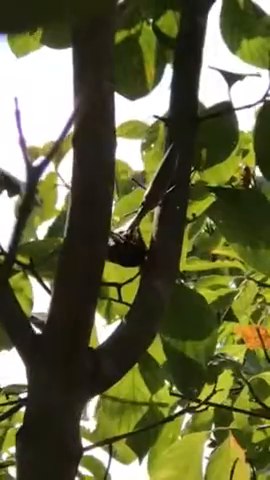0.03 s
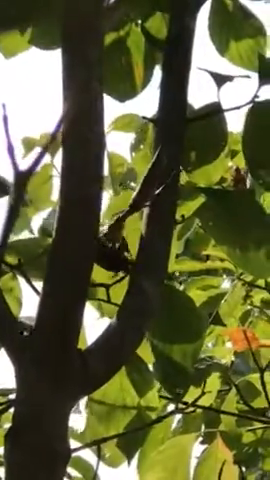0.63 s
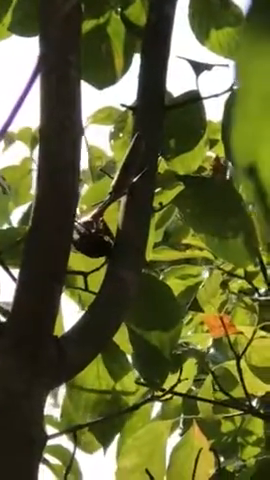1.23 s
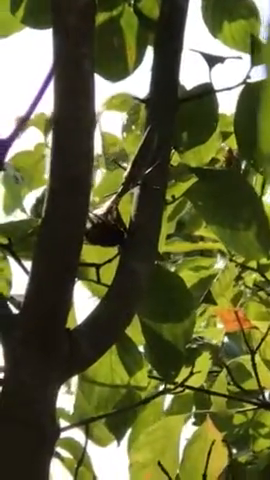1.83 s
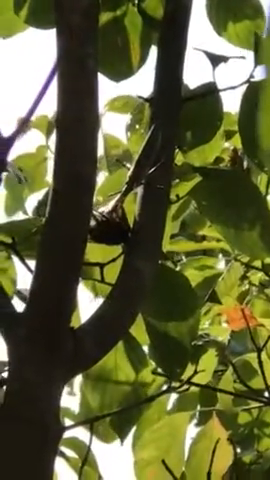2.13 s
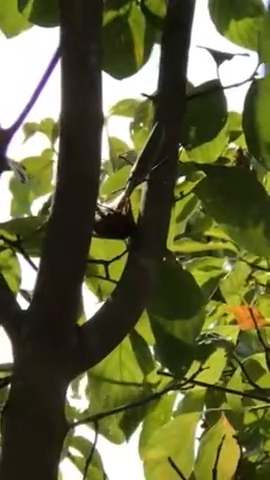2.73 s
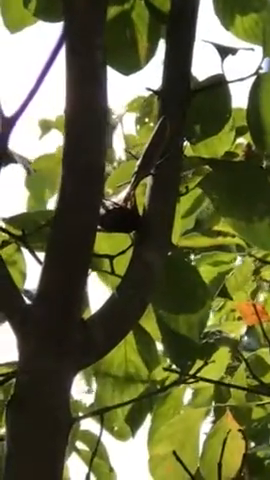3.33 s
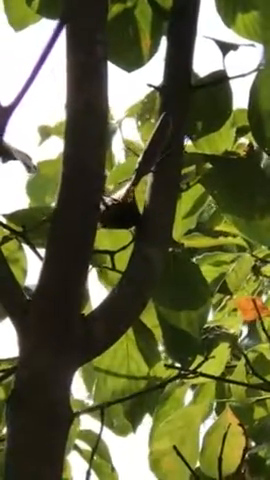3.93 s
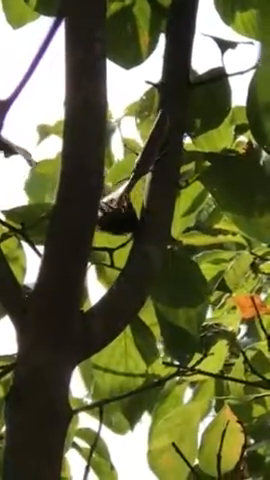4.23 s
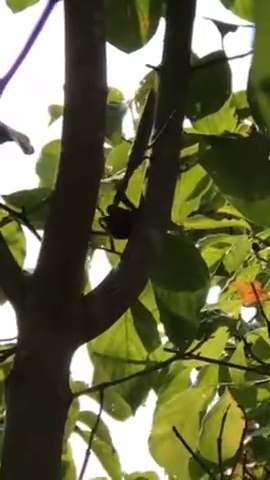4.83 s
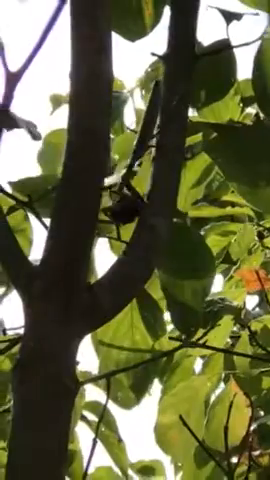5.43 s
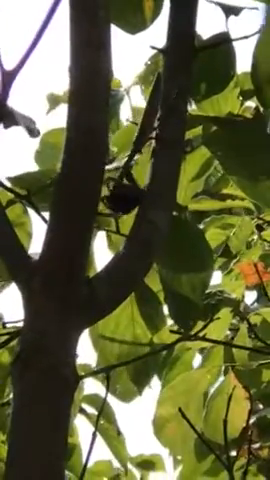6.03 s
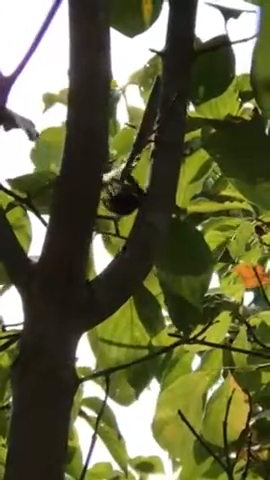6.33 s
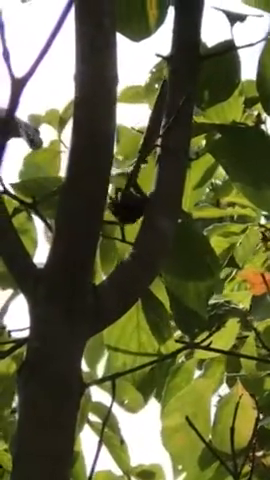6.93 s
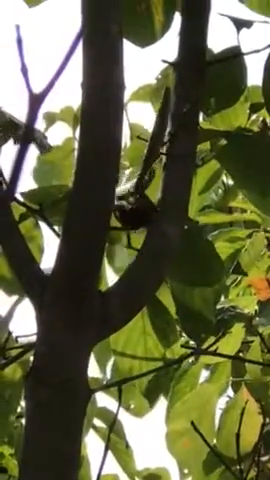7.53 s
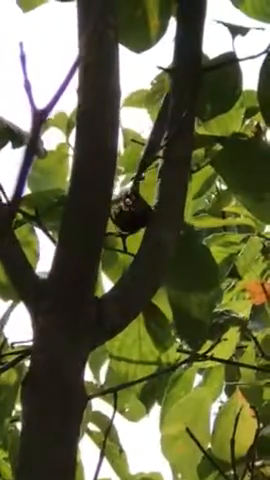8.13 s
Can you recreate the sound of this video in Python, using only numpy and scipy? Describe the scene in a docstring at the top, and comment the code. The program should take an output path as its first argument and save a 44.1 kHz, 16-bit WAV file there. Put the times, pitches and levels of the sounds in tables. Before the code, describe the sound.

A captured cicada buzzes its wings in harsh, irregular, crackling fits in a tree, over a faint outdoor wash.

```python
"""A cicada, held by a predator in the fork of a tree, thrashes its wings about 38 times a second, in fits.
Every stroke snaps the stiff wings against bark and legs, and the snaps scatter among trunks and leaves.
In the second half the wings also quiver softly against the bark. Behind the insect are soft bumps of a
hand on the microphone, a few thin far chirps, a dull wash of leaves and traffic, and a machine's hum."""
import sys
import numpy as np
from scipy import signal
from scipy.fft import rfft, irfft
from scipy.io import wavfile

SR = 44100
rng = np.random.default_rng(int(sys.argv[2]) if len(sys.argv) > 2 else 0)


def output_pcm(signal):
    """Save a mono or channel-first signal as 16-bit PCM at the path in sys.argv[1].

    Samples are clipped to [-1, 1] before scaling.
    """
    pcm = np.clip(np.atleast_2d(signal).T, -1, 1) * 32767
    wavfile.write(sys.argv[1], SR, np.round(pcm).astype(np.int16))


N = 360738
TIME = np.arange(N) / SR

# A snap's "body" boosts its lower pitches; its "scatter" is how much nearby bark and leaves throw back.
# Fits of wing beats: (first stroke [s], last stroke [s], extra time for the first beat [s],
# start level [dB], end level [dB], return stroke against main stroke [dB], body [dB], scatter [dB])
WING_FITS = [(0.517, .5447, 0, -41.5, -48, -20, 4, -2), (0.5722, .6708, 0.00076, -35, -35, -22, 4, -3),
             (0.7034, 0.8114, 0.0026, -32.5, -33.5, -18, 2.5, -4),
             (.8672, 0.9052, 0.0064, -33, -41, -25.5, 3.5, -0.5),
             (3.9555, 3.98, 0.017, -42, -46, -20, 0.5, -2.5), (4.399, 4.5063, 0.004, -47.5, -45, -5, 1, 4),
             (4.546, 4.8363, 0.00063, -29, -30.5, -15, -1.5, -1.5),
             (5.1, 5.127, 0, -31.5, -34, -21, 1.5, -2),
             (5.2412, 5.4522, 0.0031, -33, -31.5, -12, 1.5, -1.5),
             (5.5321, 5.642, 0.0056, -31, -28, -16.5, 0, -1.5),
             (5.728, 5.76, 0.0012, -31.5, -33, -14, 0, 0), (5.8447, 5.9852, .003, -32.5, -32, -9, -1, 1.5),
             (6.076, 6.218, .001, -35.5, -33.5, -7, 1.5, 3.5), (6.325, 6.3564, 0, -34.5, -35, -10, -0.5, 2),
             (6.453, 6.4814, 0.0048, -37, -36.5, -31.5, 2.5, 1.5),
             (6.587, 6.638, 0, -37, -36, -25.5, 1, 1.5), (6.7699, 7.005, 0.0019, -35.5, -29, -11.5, 0.5, 0),
             (7.104, 7.135, 0.0078, -31.5, -27, -21, -0.5, -2.5),
             (7.275, 7.336, 0, -30.5, -31.5, -6.5, 1.5, -3), (7.593, 7.832, 0, -38, -34, -13, 0, 5.5),
             (8.0593, 8.089, 0.0083, -31, -32, -11.5, 1.5, -3)]
# Strokes that hit the bark squarely: (time [s], level [dB])
SQUARE_HITS = [(4.784, -25), (4.8374, -27), (5.2397, -28.5), (5.399, -26.5), (5.5618, -26), (5.6138, -26),
               (6.218, -33), (6.823, -28), (6.926, -26), (7.671, -26), (7.7238, -26), (7.8062, -28)]
# Lone flicks of a wing: (time [s], level [dB], body [dB], scatter [dB])
WING_FLICKS = [(.412, -60, -15.5, 3), (.4992, -49, -2, 1), (0.5626, -41, 5.5, 0), (0.831, -45, -2, 5.5),
               (.844, -37, 7.5, -4), (3.8887, -50, 11, -1), (4.1519, -49, 3.5, 1.5), (4.167, -43, 8, .5),
               (4.2176, -40, 1, -1.5), (4.2895, -43, -2, -6), (4.381, -52.5, 5, 8), (4.53, -37, -5, 0),
               (4.9794, -30.5, 2.5, -5.5), (5.7714, -32.5, 9, -8), (6.7808, -38.5, 0, 0),
               (7.4636, -40, 0.5, 0), (7.9459, -29.5, -4, -2.5)]
TWIST_S = 2.0   # the insect twists round here, so its wings strike with another tone colour
# Tone colour of a snap before the twist: (frequency [Hz], relative level [dB])
COLOUR_BEFORE_TWIST = [(150, -17.5), (500, -14), (1500, -15), (2300, -12), (3700, -7), (5200, -9),
                       (6300, -3.5), (7600, -4.5), (8800, 1), (10600, -1.5), (12000, -1), (15700, -2.5),
                       (17000, -31)]
# Tone colour of a snap after the twist: (frequency [Hz], relative level [dB])
COLOUR_AFTER_TWIST = [(150, -27), (420, -19.5), (700, -14.5), (1500, -14), (2800, -12), (4300, -10.5),
                      (6300, -9.5), (7800, -8), (8500, -3), (9200, -1.5), (10500, -4.5), (12000, -0.5),
                      (15700, -1.5), (17000, -18)]
# Pitches the wing rings at: (pitch [Hz], width [Hz], level before the twist [dB], level after it [dB])
WING_RESONANCES = [(2750, 260, -22, -4.5), (3570, 170, -11, -5), (4460, 75, 3, -18), (6100, 180, -6.5, -20),
                   (8860, 150, -4, -14)]
# Strokes that set a twig ringing briefly: (time [s], pitch [Hz], peak level [dB])
TWIG_PINGS = [(.5665, 5400, -48), (.7025, 6200, -38), (5.129, 5650, -39)]
# Strength of the quivering, which lets up briefly after 6.2 s: (time [s], level [dB])
QUIVER_LEVEL = [(4.25, -99), (4.42, -62), (5.4, -64), (6.1, -63.5), (6.3, -73.5), (6.73, -71), (6.85, -63),
                (8.18, -64)]
# Tone colour of the quivering: (frequency [Hz], relative level [dB])
RUBBING_COLOUR = [(300, 8.5), (1500, 1.5), (3000, 1), (7500, 0), (9000, -1), (10500, 1), (12500, -6),
                  (15700, -1)]
# Tone colour of the sound thrown back by bark and leaves: (frequency [Hz], gain [dB])
SCATTER_COLOUR = [(300, 1), (1500, -5.5), (4500, 0), (9000, 1.5), (15000, -1)]
# Echoes from the two trunks of the fork and a near branch: (delay [s], gain [dB])
TRUNK_ECHOES = [(.0023, -38), (.0055, -24.5), (0.0119, -18.5)]
# Bumps of the hand: (centre time [s], pitch [Hz], level [dB], overtone against the thud [dB])
HAND_BUMPS = [(.146, 47.6, -49, -4), (0.442, 209.5, -46.5, -22.5), (0.469, 268, -50.5, -27),
              (.534, 81, -54, 6), (1.731, 48, -52, -10), (1.89, 62.8, -43, -2.5), (2.041, 64.7, -52, -20),
              (2.524, 60, -56, -9.5), (2.849, 61.3, -55.5, -16), (6.74, 73, -59, -16),
              (7.509, 49.4, -52, -10), (7.677, 57.6, -43, -10)]
# Chirps of far insects: (start [s], length [s], level [dB])
FAR_CHIRPS = [(.29, 0.093, -86), (1.02, .14, -82), (1.308, .16, -82), (1.596, 0.14, -81.5)]
# Tone colour of the outdoor wash: (frequency [Hz], relative level [dB])
WASH_COLOUR = [(150, -24), (250, -0.5), (367, -3.5), (500, -7), (1500, -7), (2900, -9), (4500, -12.5),
               (6400, -17), (7600, -20), (9500, -23), (12000, -27), (15700, -25.5)]
# Tone colour of the far traffic: (frequency [Hz], relative level [dB])
TRAFFIC_COLOUR = [(20, -43), (40, -9.5), (58, 3.5), (80, -4), (105, -4), (170, -8), (260, -11),
                  (400, -29.5), (800, -37)]
# Strength of the far traffic: (time [s], level [dB])
TRAFFIC_LEVEL = [(0, -68), (.5, -64), (1.3, -67.5), (3.5, -68.5), (8.18, -65)]
# Bands that the microphone's housing weakens: (frequency [Hz], width [Hz], share removed [0-1])
HOUSING_NOTCHES = [(4920, 720, 0.24), (7760, 240, 0.47), (10550, 600, 0.34)]


def cicada_wings(trim_db=-0.93):
    """Every contact makes a snap, which rings in the wing and bounces off the surroundings."""
    snaps = np.zeros(N)
    for time_s, db, body_db, scatter_db in wing_contacts():
        colour = COLOUR_BEFORE_TWIST if time_s < TWIST_S else COLOUR_AFTER_TWIST
        add(snaps, time_s, from_db(db + trim_db) * wing_snap(colour, body_db, scatter_db))
    wings = snaps.copy()
    for hz, width, before_db, after_db in WING_RESONANCES:
        wings += from_db(np.where(TIME < TWIST_S, before_db, after_db)) * resonance(snaps, hz, width)
    trunks = sum(from_db(db) * delayed(wings, delay_s) for delay_s, db in TRUNK_ECHOES)
    return wings + trunks + hard_echo(wings) + far_trees(wings)


def wing_contacts(square_body_db=-1.5, square_scatter_db=-1.5):
    """List every touch of a wing as (time [s], level [dB], body [dB], scatter [dB])."""
    fits = [wing_beats(*fit) for fit in WING_FITS]
    grazes, strokes, returns = (uneven(np.vstack(rows)) for rows in zip(*fits))
    for time_s, db in SQUARE_HITS:
        nearest = np.argmin(np.abs(strokes[:, 0] - time_s))
        strokes[nearest] = time_s, db, square_body_db, square_scatter_db
    return np.vstack([strokes, returns, grazes, WING_FLICKS])


def wing_beats(first_s, last_s, lag_s, start_db, end_db, return_db, body_db, scatter_db, beat_hz=37.5):
    """One fit: in each beat the wing tip grazes the bark, then the wing strikes and swings back."""
    steady_s = last_s - first_s - lag_s
    count = max(round(steady_s * beat_hz), 1)
    beat_s = steady_s / count
    beat = np.arange(count + 1)
    times = first_s + beat * beat_s + lag_s * (beat > 0)
    levels = np.linspace(start_db, end_db, count + 1)
    strokes = np.array([(time_s, db, body_db, scatter_db) for time_s, db in zip(times, levels)])
    grazes = strokes + [0, -14, 0, 6.5]   # quieter and more scattered
    grazes[:, 0] -= np.where(beat > 0, 0.0042, 0.0034)   # a shorter lead when the wing starts from rest
    returns = strokes + [0.48 * beat_s, return_db, 2.5, -1.5]   # mid-beat, duller and less scattered
    return grazes, strokes, returns


def uneven(contacts, jitter_s=0.0002, level_db=1.1265, colour_db=0.84):
    """No two snaps are quite alike in timing, strength or tone colour."""
    return contacts + rng.standard_normal(contacts.shape) * [jitter_s, level_db, colour_db, colour_db]


def wing_snap(colour, body_db, scatter_db, buckle_s=0.0015, body_hz=7500, size=8192):
    """The wing's thin skin buckles in a tiny crackle; bark and leaves throw back a short, dense tail."""
    t, hz = TIME[:size], np.fft.rfftfreq(size, 1 / SR)
    crackle = burst(np.exp(-0.5 * (t / buckle_s) ** 2), energy=buckle_s * SR)
    # The wing points elsewhere at every stroke, so each tail is new.
    swell = np.clip(2 * t / 0.0037 - 1, 0, 1)   # fully risen after 3.7 ms
    tail = burst(swell * fade(t, fade_s=0.09), energy=buckle_s * SR)
    scattered = rfft(tail) * from_db(scatter_db + at_hz(SCATTER_COLOUR, hz))
    # Every spot that is hit has a slightly different tone colour.
    spot_db = np.interp(hz, np.geomspace(400, 16000, 16), 2.48 * rng.standard_normal(16))
    body = 1 / (1 + (hz / body_hz) ** 6)
    gain = rms_one(from_db(at_hz(colour, hz) + body_db * body + spot_db))
    return irfft((rfft(crackle) + scattered) * causal(gain))


def twig_pings(ring_s=0.032):
    """A struck twig rings briefly at a single pitch."""
    out, t = np.zeros(N), TIME[:SR // 4]
    for time_s, hz, db in TWIG_PINGS:
        add(out, time_s, from_db(db) * fade(t, ring_s) * np.sin(2 * np.pi * hz * t))
    return out


def wing_quiver():
    """Quivering wings rub on the bark with a soft hiss."""
    return from_db(in_time(QUIVER_LEVEL)) * coloured_noise(RUBBING_COLOUR)


def hard_echo(sound, delay_s=0.0285, echo_db=-31, dull_hz=6000):
    """A hard surface about five metres off answers each snap with a duller copy."""
    dull = signal.sosfilt(signal.butter(1, dull_hz, fs=SR, output="sos"), sound + 1e-18)
    return from_db(echo_db) * delayed(dull, delay_s)


def far_trees(sound, tail_db=-16, fade_s=0.21):
    """Farther trees send back many tiny echoes that blend into a faint, longer tail."""
    echoes = burst(fade(TIME[:SR // 2], fade_s), energy=from_db(tail_db) ** 2)
    return signal.fftconvolve(sound, echoes)[:N]


def hand_bumps(half_length_cycles=0.9, overtone_ratio=2.3):
    """A hand nudges the microphone's housing: a thud and its overtone, each a swing or two long."""
    out = np.zeros(N)
    for time_s, thud_hz, db, overtone_db in HAND_BUMPS:
        for hz, level_db in (thud_hz, db), (thud_hz * overtone_ratio, db + overtone_db):
            during = np.abs(TIME - time_s) * hz < 4 * half_length_cycles
            cycles = (TIME[during] - time_s) * hz
            swell = np.exp(-(cycles / half_length_cycles) ** 2)
            out[during] += from_db(level_db) * swell * np.cos(2 * np.pi * (cycles + rng.random()))
    return out


def far_insects(pitch_hz=6900, width_hz=170):
    """Other insects give thin, high chirps, blurred by distance."""
    out, t = np.zeros(N), TIME[:SR // 2]
    for start_s, length_s, db in FAR_CHIRPS:
        tone = rms_one(wavering_tone(pitch_hz, width_hz, len(t)))
        swell = np.sqrt(np.abs(np.sin(np.pi * np.minimum(t / length_s, 1))))
        add(out, start_s, from_db(db) * tone * swell)
    return out


def outdoors(wash_db=-68.5, hum_hz=129.2, hum_db=-75):
    """Far leaves make a steady wash, traffic rumbles and a machine gives a wavering hum."""
    wash = from_db(wash_db) * coloured_noise(WASH_COLOUR)
    traffic = from_db(in_time(TRAFFIC_LEVEL)) * coloured_noise(TRAFFIC_COLOUR)
    hum = wavering_tone(hum_hz, width_hz=9, size=N + SR)[SR:]   # skip the build-up
    return wash + traffic + from_db(hum_db) * rms_one(hum)


def from_db(db):
    """Turn decibels into a number to multiply by."""
    return 10 ** (np.asarray(db) / 20)


def rms_one(x):
    """Scale to an average strength (root mean square) of 1."""
    return x / np.sqrt(np.mean(x ** 2) + 1e-20)


def fade(t, fade_s):
    """A smooth dying away that drops 60 dB in fade_s seconds."""
    return np.exp(-np.log(1000) * t / fade_s)


def in_time(rows):
    """Join (time [s], value) rows by straight lines."""
    return np.interp(TIME, *np.transpose(rows))


def at_hz(colour, hz):
    """Read a tone colour's level at any frequency, with the octaves evenly spaced."""
    known_hz, db = np.transpose(colour)
    return np.interp(np.log(np.maximum(hz, 1)), np.log(known_hz), db)


def coloured_noise(colour):
    """Noise with the given tone colour and a strength of 1."""
    gain = from_db(at_hz(colour, np.fft.rfftfreq(N, 1 / SR)))
    return rms_one(irfft(rfft(rng.standard_normal(N)) * gain, N))


def burst(outline, energy):
    """Dense random clicks that follow a loudness outline and add up to the given energy."""
    clicks = rng.standard_normal(len(outline)) * outline
    return clicks * np.sqrt(energy / np.sum(clicks ** 2))


def resonance(sound, hz, width_hz):
    """Let one pitch through at full strength and weaken those around it."""
    decay = np.exp(-np.pi * width_hz / SR)
    feedback = [1, -2 * decay * np.cos(2 * np.pi * hz / SR), decay ** 2]
    return signal.lfilter(np.array([1, 0, -1]) * (1 - decay ** 2) / 2, feedback, sound + 1e-18)


def wavering_tone(hz, width_hz, size):
    """Noise narrowed twice around one pitch becomes an unsteady tone."""
    return resonance(resonance(rng.standard_normal(size), hz, width_hz), hz, width_hz)


def causal(gain):
    """A filter with this gain in which nothing rings before the blow (minimum phase)."""
    cepstrum = irfft(np.log(gain))
    half = len(cepstrum) // 2
    cepstrum[1:half] *= 2
    cepstrum[half + 1:] = 0
    return np.exp(rfft(cepstrum))


def delayed(sound, delay_s):
    """The same sound a little later."""
    lag = round(delay_s * SR)
    return np.concatenate([np.zeros(lag), sound[:-lag]])


def add(track, time_s, sound):
    """Mix a sound into a track at the given time."""
    start = round(time_s * SR)
    track[start:start + len(sound)] += sound[:N - start]


def scene():
    """The struggling cicada in front of its quiet surroundings, in one channel."""
    background = outdoors() + far_insects() + hand_bumps()
    return (background + cicada_wings() + twig_pings() + wing_quiver())[None]


def record(dry):
    """The microphone's housing weakens three narrow bands; the highest treble is cut steeply."""
    heard = dry
    for hz, width, share in HOUSING_NOTCHES:
        heard = heard - share * resonance(heard, hz, width)
    treble_cut = signal.ellip(10, 0.2, 75, 15900, fs=SR, output="sos")   # above 15900 Hz
    return signal.sosfilt(treble_cut, heard)


dry = scene()
out = record(dry)
output_pcm(out)
```